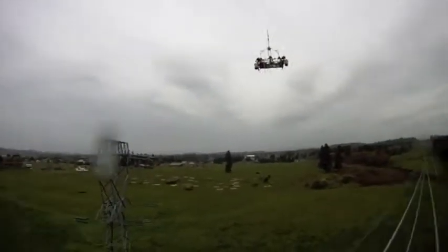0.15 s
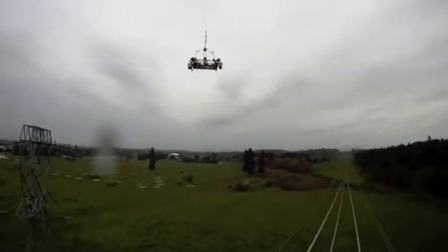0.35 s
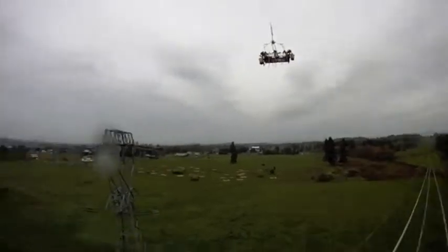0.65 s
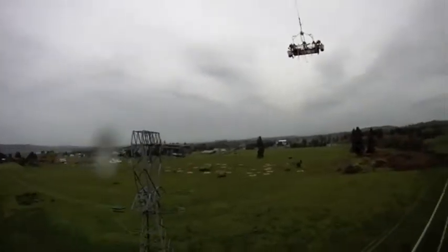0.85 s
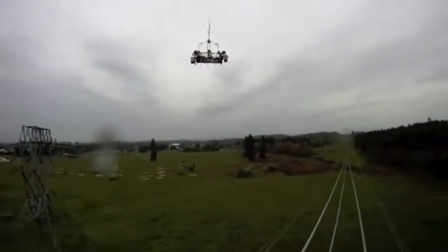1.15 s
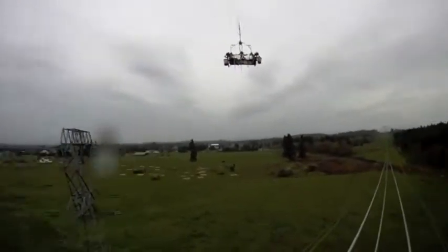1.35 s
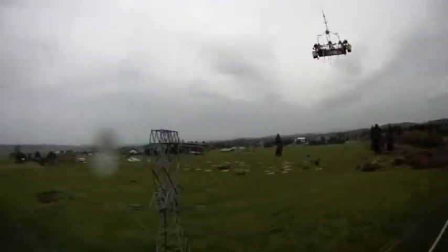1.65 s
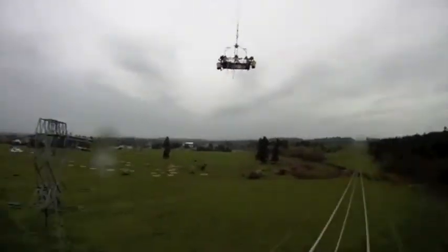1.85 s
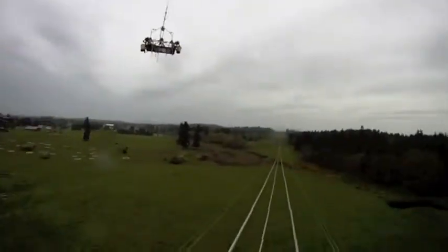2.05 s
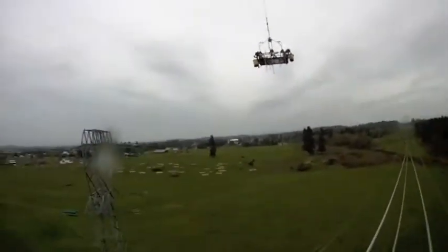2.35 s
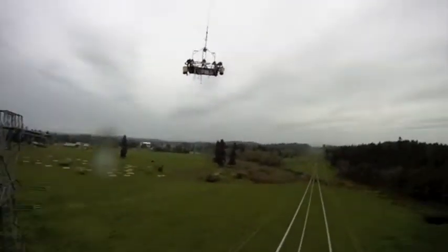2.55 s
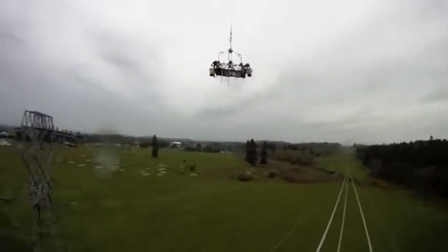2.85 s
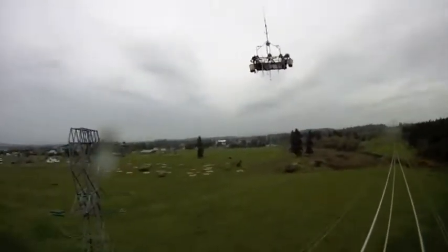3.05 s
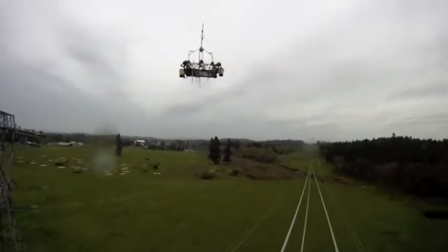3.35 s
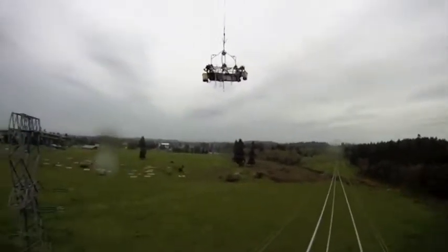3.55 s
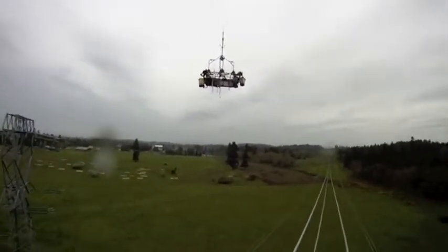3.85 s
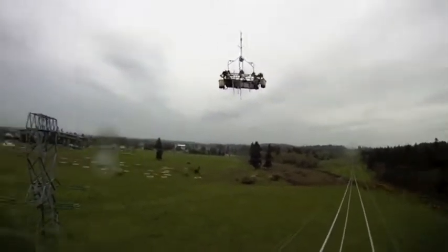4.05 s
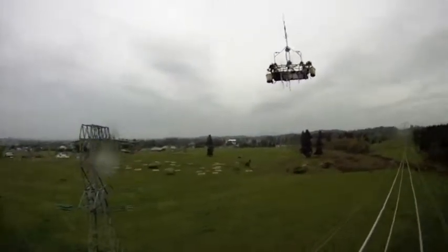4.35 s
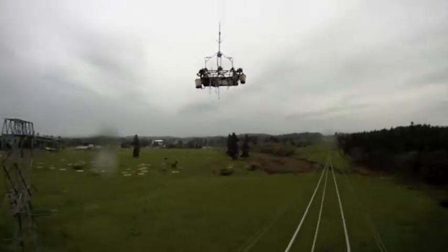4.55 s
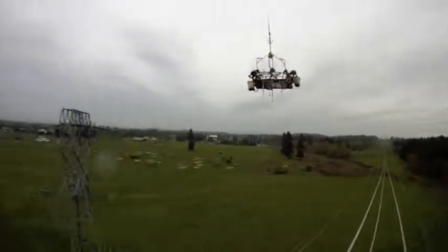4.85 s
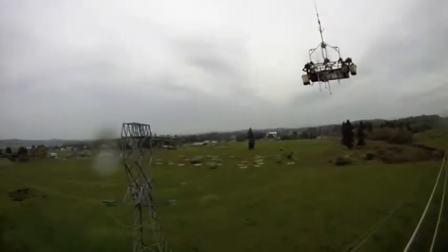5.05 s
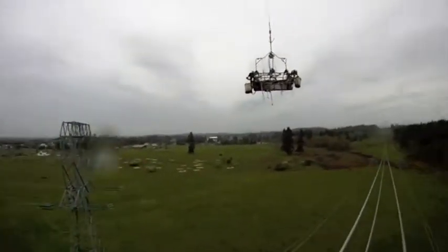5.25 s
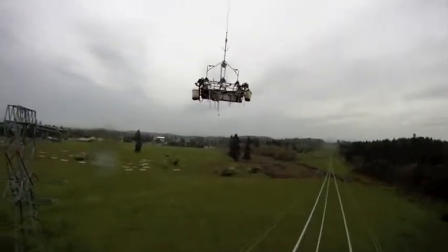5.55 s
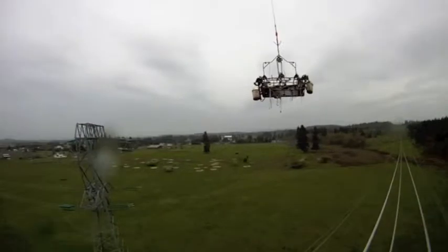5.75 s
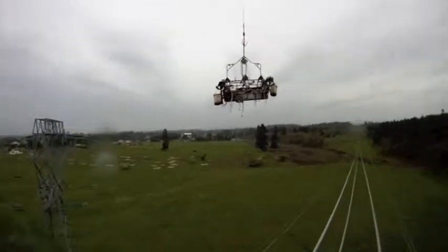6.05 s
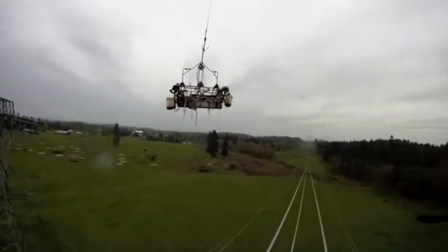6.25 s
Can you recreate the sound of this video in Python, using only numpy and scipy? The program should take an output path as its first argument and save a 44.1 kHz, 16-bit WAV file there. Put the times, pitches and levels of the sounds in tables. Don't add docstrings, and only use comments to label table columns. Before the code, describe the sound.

Continuous loud rotor noise outdoors: a rough midrange roar beating about forty times a second, each burst slightly uneven. Low drones swell and fade beneath, with smooth hiss above. Scattered sharp cracks punctuate it, clustering just after five seconds. Loudness wavers, with short dips around two and four seconds and a fall at the end. The close, mono, cheap camera sound is resonant, thin in bass, with a harsh false treble edge.

```python
import sys
import numpy as np
from scipy import signal
from scipy.fft import rfft, irfft
from scipy.io import wavfile
from scipy.ndimage import uniform_filter1d, minimum_filter1d, map_coordinates

SR = 44100
rng = np.random.default_rng(int(sys.argv[2]) if len(sys.argv) > 2 else 0)


def magnitude_from_level(level_db):
    exponent = np.asarray(level_db, float) / 20
    return 10 ** exponent


def waveform_to_disk(signal):
    frames = np.transpose(np.atleast_2d(signal))
    scaled = np.clip(frames, -1, 1) * 32767
    samples = np.round(scaled).astype(np.int16)
    wavfile.write(sys.argv[1], SR, samples)


N = 281795

# start_s, roar_db, chop_depth (0-1), tips_db (blade tips turned towards the ear)
LOADING = [(0.0, -22.5, 0.3, 2.7), (0.33, -22, 0.37, 1), (0.62, -16, .47, 0), (1.0, -18.5, 0.33, 0),
           (1.35, -17, 0.23, -0.6), (1.85, -20, 0.07, 1.5), (2.1, -26, 0.32, 0.5),
           (2.35, -20.5, 0.38, -0.5), (2.78, -21, 0.36, 0), (3.25, -19, 0.12, 0.5), (3.7, -19.5, 0.32, 0.4),
           (4.05, -25.5, 0, .6), (4.5, -24, 0.26, -.7), (4.7, -15.5, 0.35, -2), (5.2, -18, 0.47, -2.8),
           (5.6, -17, 0.29, 1.8), (5.95, -22, 0.33, 1.5), (6.39, -26.5, 0, -0.5)]


def unit(x):
    return x / np.sqrt(np.mean(x ** 2) + 1e-20)


def curves(rows):
    s, *columns = np.transpose(rows)
    return [np.interp(np.arange(N) / SR, s, column) for column in columns]


def swells(rest_db, rows):
    t = np.arange(N) / SR
    return rest_db + sum(db * np.exp(-(2 * (t - s) / length) ** 2) for s, db, length in rows)


def wobble(rate):
    knots = rng.standard_normal(int(N * rate / SR) + 4)
    return map_coordinates(knots, [np.arange(N) * rate / SR])


def coloured(x, spectrum):
    # centre_hz, width_hz, level_db
    housing = [(894, 62, -9), (1188, 24, -6), (1282.5, 85, 8.5), (1724, 60, 9.5), (1724, 24, -20),
               (1874, 42, 6.5), (2084, 29, -6.5), (2254, 103, 3.5), (2339, 52, -19.5), (2425, 183, 7.5),
               (2390, 23, -2.5), (2760, 99, 1), (3020, 35, -1.5), (3420, 130, -2), (3630, 80, -5),
               (4710, 410, 15), (5280, 140, -4), (5996, 220, -14)]
    size = 16384
    hz = np.fft.rfftfreq(size, 1 / SR)
    f, db = np.transpose([(1, -120), *spectrum, (spectrum[-1][0] + 100, -120)])
    level_db = np.interp(np.log(hz + 1), np.log(f), db)
    level_db += sum(mode_db / (1 + (2 * (hz - centre) / width) ** 2) for centre, width, mode_db in housing)
    cepstrum = irfft(np.log(magnitude_from_level(level_db)))
    cepstrum[1:size // 2] *= 2
    cepstrum[size // 2 + 1:] = 0
    impulse = irfft(np.exp(rfft(cepstrum)))
    return unit(signal.fftconvolve(x, impulse)[:N])


def chop(sharp, scatter_db, wander, lag):
    # start_s, lead_turns (over a steady beat)
    blade_lead = [(0.0, -.46), (0.45, -.54), (0.8, -.49), (1.8, -.5), (2.2, -.73), (3.2, -.81),
                  (3.65, -.73), (4.3, -.99), (4.6, -1.01), (5.0, -.86), (5.4, -.77), (5.65, -.85),
                  (6.39, -.86)]
    blade_hz = 40.7
    lead = curves(blade_lead)[0]
    depth = curves(LOADING)[1]
    turns = blade_hz * np.arange(N) / SR + lead + 2 - lag
    passage = np.round(turns).astype(int)
    size, shift = rng.standard_normal((passage.max() + 1, 2)).T
    within = turns - passage - np.clip(wander * shift[passage], -.2, .2)
    burst = np.exp(sharp * (np.cos(2 * np.pi * within) - 1))
    burst = burst * np.cos(np.pi * (turns - passage)) ** 2
    burst = burst * magnitude_from_level(2 * scatter_db * size[passage])
    share = np.clip(1.8 * depth, 0, .97)
    return np.sqrt(1 - share + share * burst / np.mean(burst))


def slaps(roar_db):
    # start_s, peak_db
    slap_events = [(0.127, -2), (0.5254, -5), (0.6008, -2), (0.699, 2), (0.743, 4), (0.766, -11),
                   (1.066, -1), (1.5812, 2.5), (2.1053, -2), (2.1509, 1), (2.252, -3), (2.5694, 4),
                   (2.6419, 0.5), (2.8424, 4), (3.5504, -0.5), (3.6004, 1.5), (4.764, 4), (4.8818, 4),
                   (4.929, 5.5), (5.0777, -1), (5.1033, -3), (5.126, 0.5), (5.1523, 2), (5.1759, 4),
                   (5.1995, 9.5), (5.2994, 4.5), (5.3231, 6), (5.371, -7), (5.42, -9), (5.69, 4)]
    crack = np.zeros(N + SR)
    t = np.arange(SR // 50) / SR
    puff = (1 - np.exp(-t / 0.0036)) * magnitude_from_level(-60 * t / 0.031)
    for s, db in slap_events:
        at = round(s * SR)
        over_db = db - roar_db[at]
        crack[at:at + len(t)] += magnitude_from_level(over_db - 11.5) * puff * rng.standard_normal(len(t))
        crack[at + SR // 1500] += magnitude_from_level(over_db + 5.5)
    return crack[:N]


def roar():
    # peak_s, rise_db, length_s
    gusts = [(0.1, 0.5, .13), (0.818, -0.7, .15), (1.44, -3.5, 0.3), (1.643, 1.5, 0.086), (2.664, 4, 0.029),
             (2.917, 4, 0.16), (3.09, -1, 0.086), (3.427, 1, 0.078), (3.717, 0.8, .2), (4.397, 0.5, .1),
             (4.78, 1.6, 0.077), (4.957, -1.5, 0.054), (5.703, -0.5, 0.085)]
    # peak_s, rise_db, length_s
    root_swells = [
        (0.15, -1.5, .2),
        (0.8, 2.5, 0.12),
        (1.1, 1.5, 0.25),
        (1.704, -2, 0.24),
        (2.65, 2, .25),
        (2.917, -2.5, 0.13),
        (3.352, 1.5, 0.23),
        (4.95, -1.5, .3),
        (5.404, -2, 0.34),
        (6.15, -3.5, 0.27),
    ]
    # peak_s, rise_db, length_s
    boom_swells = [
        (0.2, 3, 0.57),
        (1.05, 1.5, 0.22),
        (2.15, 3.5, .2),
        (2.75, -3, 0.7),
        (3.4, 1.5, 0.46),
        (4.65, 2.5, .2),
        (4.928, -4.5, .15),
        (5.65, 1, .2),
        (5.9, -2, 0.18),
    ]
    # pitch_hz, level_db (per Hz)
    upper_colour = [(2700, -54), (3000, -12.5), (3150, -1.5), (3650, -5.5), (3900, -16), (4350, -29),
                    (5100, -31.5), (5700, -22.5), (6000, -20)]
    middle_colour = [(1250, -41), (1500, -17.5), (1650, -7.5), (2000, -5.5), (2600, -15.5), (2900, -23.5),
                     (3100, -65)]
    lower_colour = [(600, -70), (880, -26.5), (1020, -3.5), (1400, -8), (1550, -7.5), (1800, -38)]
    body_colour = [(250, -18), (380, -12.5), (470, -2), (540, 0), (700, -7), (830, -5.5), (920, -5),
                   (1000, -20)]
    rumble_colour = [(8, -30), (14, -6), (25, -16), (45, -0.5), (70, -8), (140, 1.5), (180, 1), (225, -8),
                     (300, -2), (380, -5), (450, -43)]

    loading_db, _, tips_db = curves(LOADING)
    roar_db = swells(loading_db, gusts) + 0.5 * wobble(8.5)
    load_db = roar_db + 20
    upper_db = -33 + 0.98 * load_db + tips_db + 1 * wobble(7.5)
    lower_db = swells(-23, root_swells) + 0.74 * load_db + 0.8 * wobble(8.2)
    body_db = swells(-33.5, boom_swells) + 0.36 * load_db + 1.13 * wobble(7.8)

    crackle = magnitude_from_level(1.7 * wobble(450))
    slap = slaps(roar_db)
    beats = [chop(sharp=1.65, scatter_db=0.7, wander=0.049, lag=lag) for lag in (-.02, 0, .04)]
    upper, middle, lower = (unit(beat * crackle * rng.standard_normal(N)) + slap for beat in beats)
    body = rng.standard_normal(N) * beats[1] ** 0.81 * magnitude_from_level(0.31 * wobble(90))
    rumble = rng.standard_normal(N) * beats[1] ** 0.31

    mix = magnitude_from_level(roar_db) * coloured(middle, middle_colour)
    mix += magnitude_from_level(upper_db) * coloured(upper, upper_colour)
    mix += magnitude_from_level(lower_db) * coloured(lower, lower_colour)
    mix += magnitude_from_level(body_db) * coloured(body, body_colour)
    mix += magnitude_from_level(-39.0) * coloured(rumble, rumble_colour)
    return mix


def main_rotor():
    # multiple (of the blade rate), level_db
    weak_partials = [(1, -59.5), (2, -51.5), (5, -47), (6, -50.5), (7, -51), (8, -51), (9, -64), (10, -49),
                     (11, -52), (13, -48)]
    # peak_s, rise_db, length_s
    third_swells = [
        (0.456, 11, 0.36),
        (1.2, 6, 0.15),
        (1.777, 9, .2),
        (2.2, 6.5, 0.56),
        (3.5, 4, 0.22),
        (3.95, 8, .3),
        (4.555, 7, .12),
        (5.53, 13, 0.31),
        (5.905, 8, 0.13),
    ]
    # peak_s, rise_db, length_s
    fourth_swells = [(0.42, 12, 0.41), (1.1, 13.7, 0.19), (1.43, 8, 0.11), (1.82, 12.6, 0.22),
                     (2.5, 4.7, 0.14), (2.85, 9.8, 0.63), (3.25, 7.7, .12), (3.52, 11.7, 0.2),
                     (4.18, 10, 0.32), (5.07, 6.6, .2), (5.33, 9.1, 0.36), (5.64, 15, .2), (6.25, 11, 0.21)]
    angle = 2 * np.pi * 40.8 * np.arange(N) / SR
    weak = [(k, db + 5.3 * np.minimum(wobble(6.5), 1)) for k, db in weak_partials]
    strong = [(3, swells(-49, third_swells)), (4, swells(-47, fourth_swells))]
    return sum(np.sqrt(2) * magnitude_from_level(db) * np.sin(k * angle + 0.51 * wobble(2.503)) for k, db in weak + strong)


def tail_rotor():
    # start_s, lead_turns (over a steady beat)
    pedal_lead = [(0.0, .03), (0.95, .55), (1.25, .65), (2.4, .13), (3.65, .07), (4.85, .8), (5.7, .18),
                  (6.39, -.19)]
    # level_db, fading_db
    tail_partials = [(-45, 1.5), (-44, -0.7), (-50, 3)]
    tail_hz = 97
    lead = curves(pedal_lead)[0]
    angle = 2 * np.pi * (tail_hz * np.arange(N) / SR + lead)
    return sum(np.sqrt(2) * magnitude_from_level(db + fade_db * wobble(2.64)) * np.sin(k * angle)
               for k, (db, fade_db) in enumerate(tail_partials, start=1))


def turbine():
    # pitch_hz, level_db (per Hz)
    hiss_colour = [(2500, -49), (3600, -1), (4350, 0), (4700, -8), (5300, 8), (5700, 9.5), (6000, 9)]
    tips_db = curves(LOADING)[2]
    hiss_db = -50.0 + 0.8 * tips_db + 0.5 * wobble(4.3)
    return magnitude_from_level(hiss_db) * coloured(rng.standard_normal(N), hiss_colour)


def ticks():
    # start_s, peak_db
    tick_events = [(0.1271, -28), (0.5232, -23), (1.1398, -21.5), (2.569, -36), (2.8614, -19.5),
                   (2.91, -22), (3.159, -33), (3.3084, -21), (3.429, -23.5), (3.553, -24), (5.1243, -39),
                   (5.1995, -27), (5.2235, -47), (5.2989, -42), (5.3235, -29), (5.6175, -34), (5.889, -24)]
    # pitch_hz, level_db (per Hz)
    tip_colour = [(1500, -40), (2800, 5), (3600, 12), (4350, -16), (5200, -16), (6000, -1)]
    crack = np.zeros(N + SR)
    t = np.arange(SR // 100) / SR
    for s, db in tick_events:
        at = round(s * SR)
        crack[at:at + len(t)] += magnitude_from_level(db - 60 * t / 0.025) * rng.choice([-1, 1], len(t))
    return magnitude_from_level(-43.5) * coloured(crack[:N], tip_colour)


def scene():
    return (roar() + ticks() + turbine() + main_rotor() + tail_rotor())[None]


def limited(x, top):
    need = top / np.maximum(np.abs(x), top)
    quick = uniform_filter1d(minimum_filter1d(need, size=160), size=80)
    linger = uniform_filter1d(minimum_filter1d(need, size=900, origin=449), size=200)
    return x * quick * np.roll(linger, 150) ** 1.4


def band_limit(x):
    return signal.sosfilt(signal.butter(12, 15710, fs=SR, output="sos"), x)


def record(dry):
    sample_hz, top_hz = 12000, 15300
    slow = signal.resample_poly(limited(dry, top=.92), sample_hz, SR, axis=1)
    held = np.repeat(slow, 4, axis=1)
    x = signal.resample_poly(held, SR, 4 * sample_hz, axis=1)[:, :N]
    x = np.pad(x, ((0, 0), (0, N - x.shape[1])))
    x = x + magnitude_from_level(-66) * rng.standard_normal(x.shape)
    band = np.where(np.fft.rfftfreq(N, 1 / SR) < top_hz, 1, magnitude_from_level(-22))
    x = irfft(rfft(x) * band, N)
    return band_limit(x)


dry = scene()
out = record(dry)
waveform_to_disk(out)
```